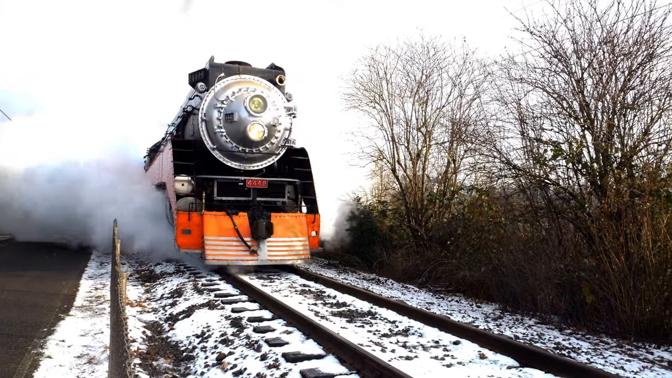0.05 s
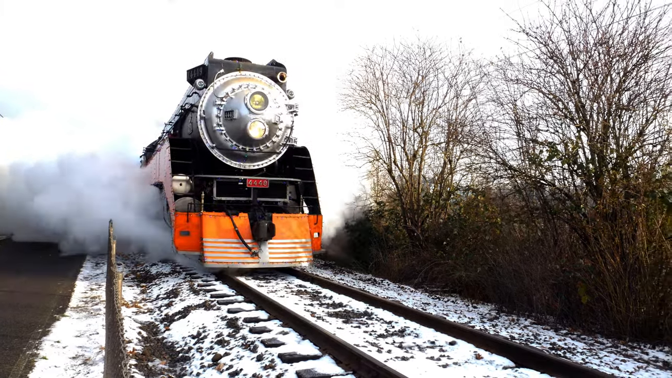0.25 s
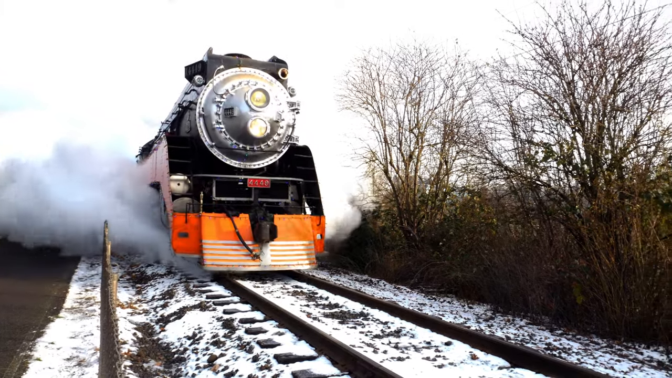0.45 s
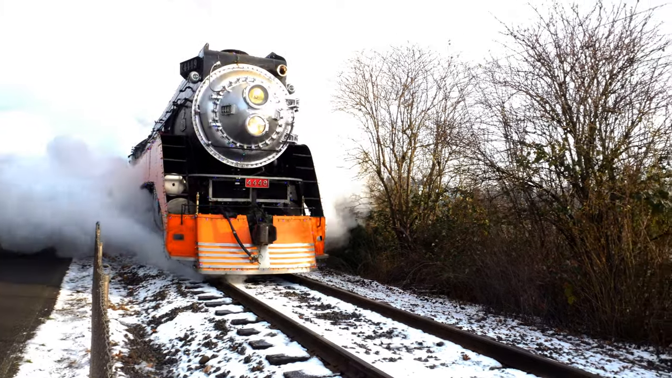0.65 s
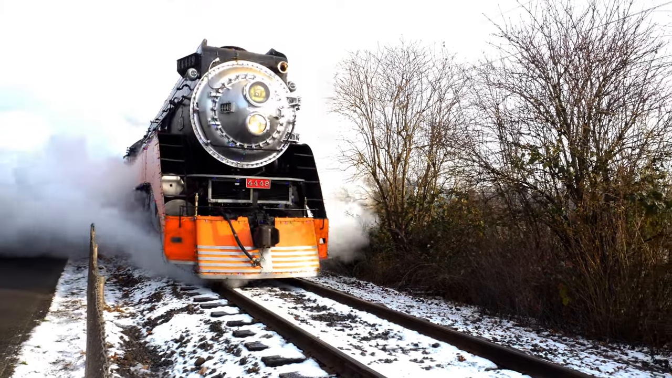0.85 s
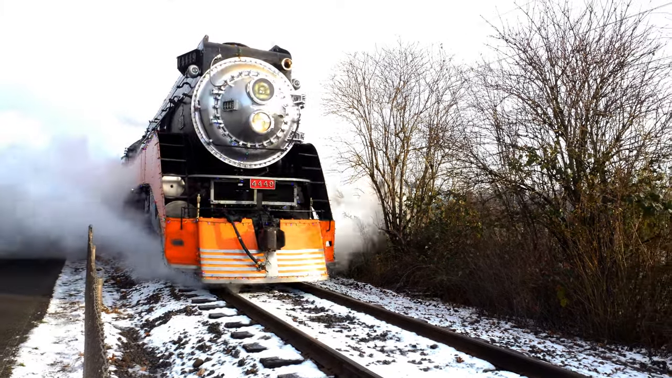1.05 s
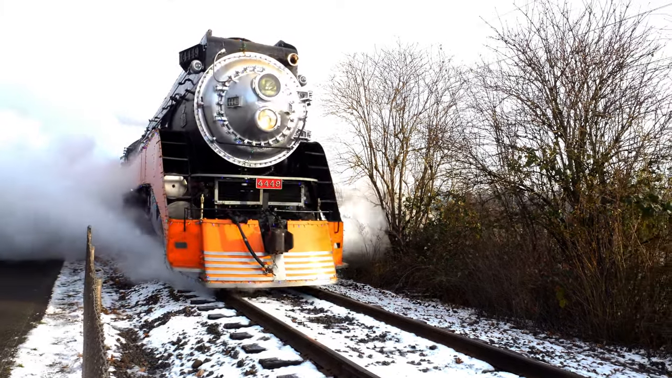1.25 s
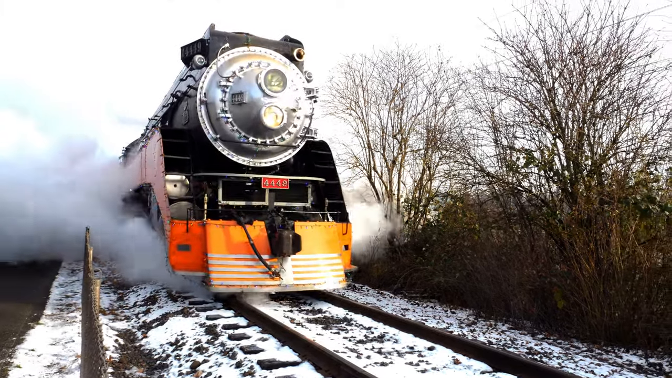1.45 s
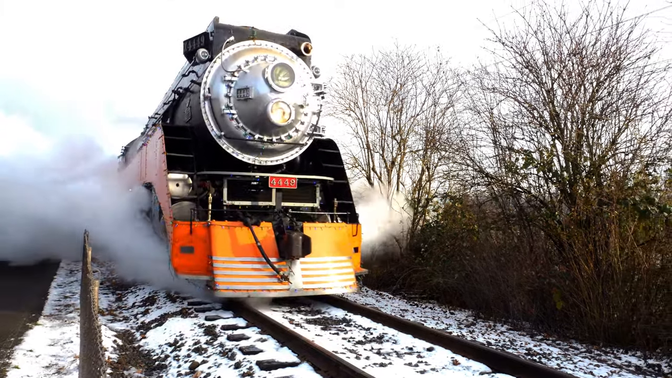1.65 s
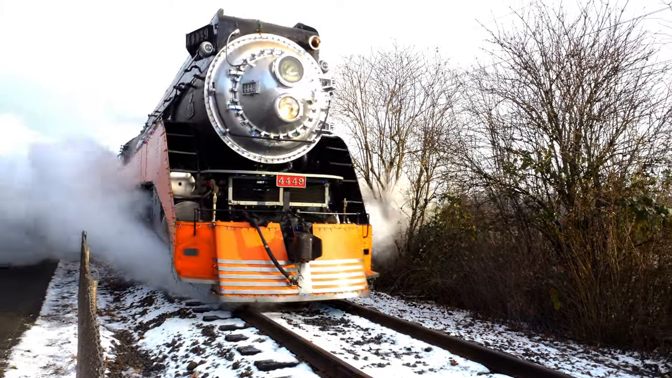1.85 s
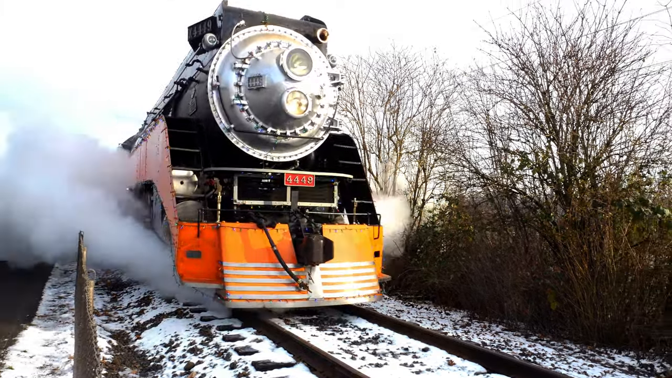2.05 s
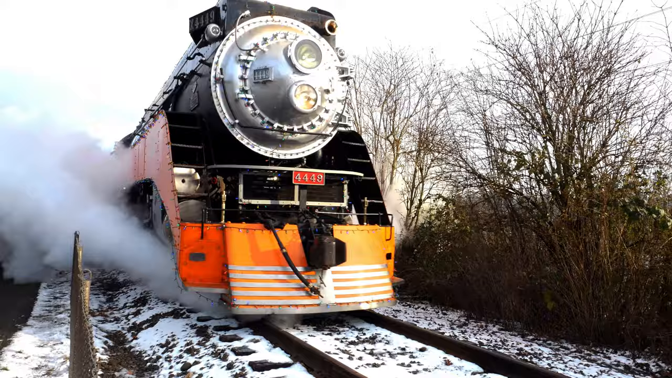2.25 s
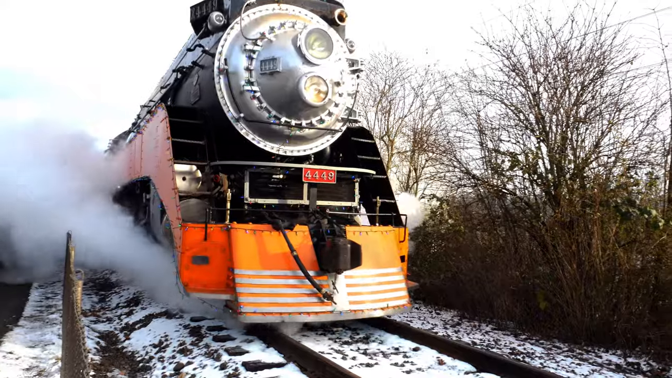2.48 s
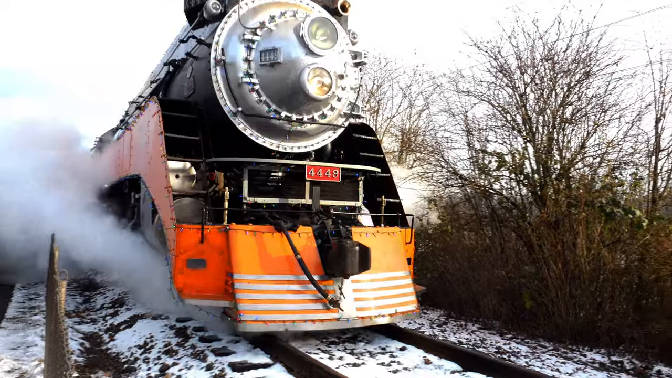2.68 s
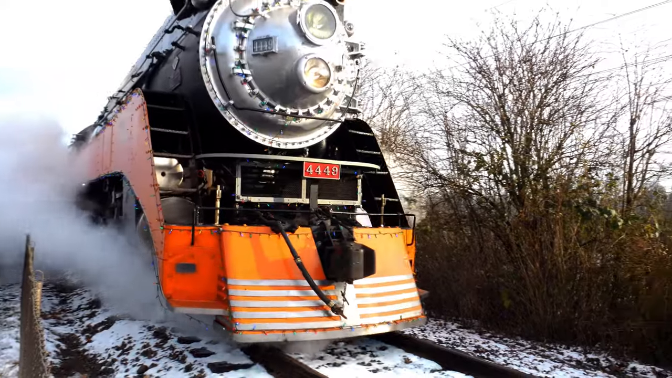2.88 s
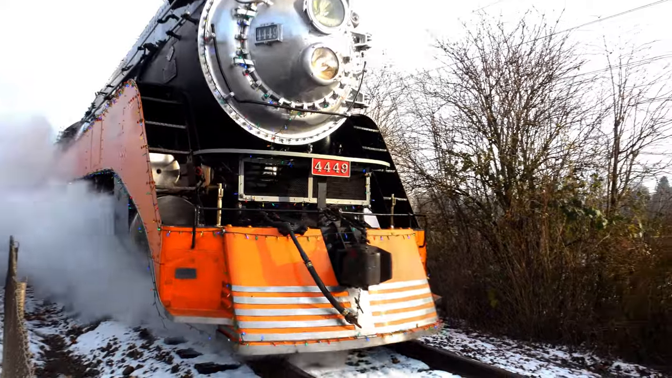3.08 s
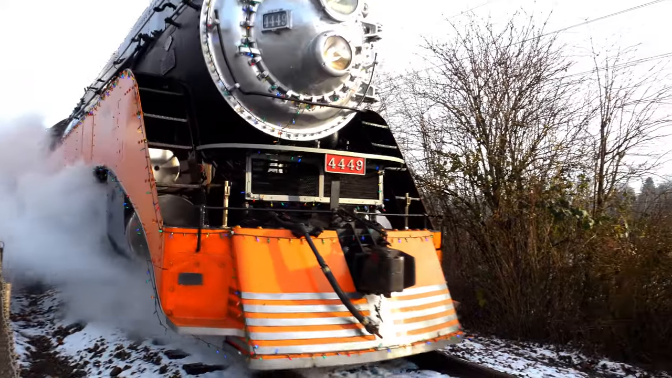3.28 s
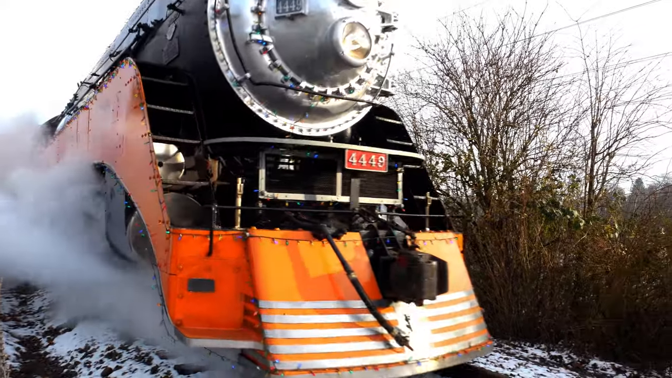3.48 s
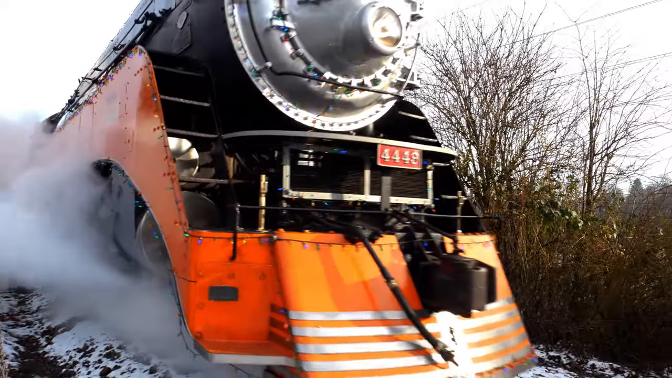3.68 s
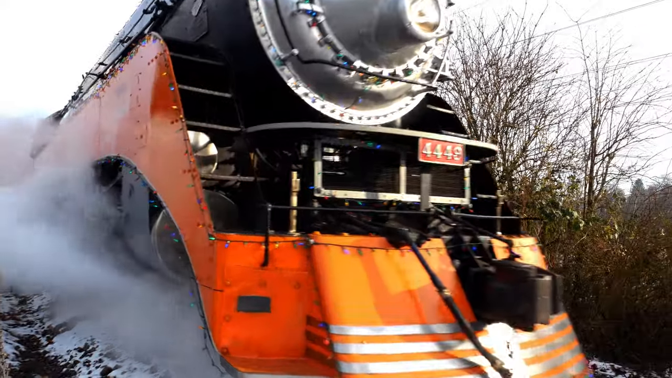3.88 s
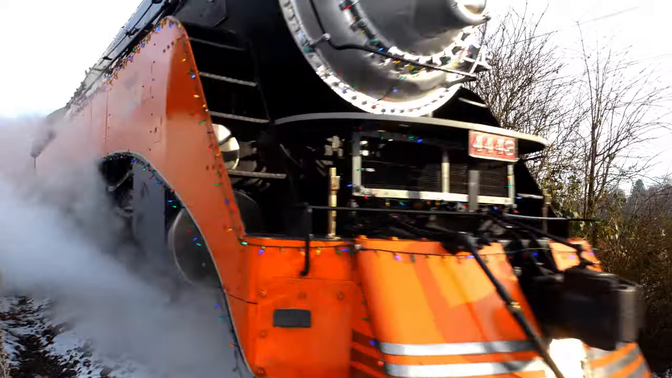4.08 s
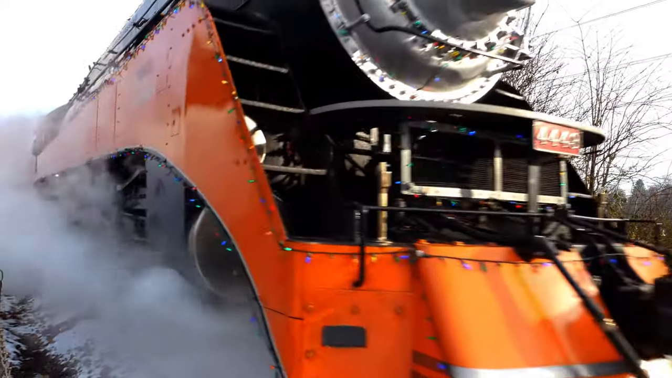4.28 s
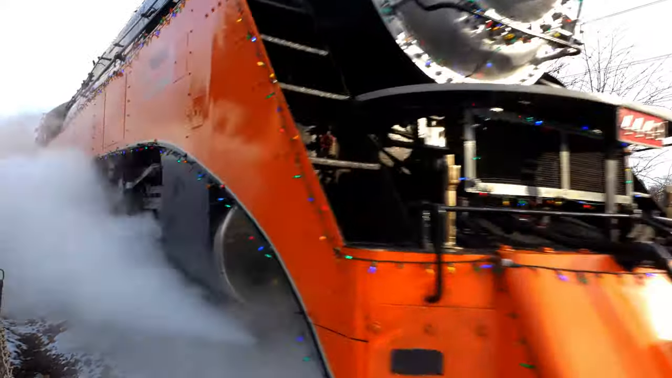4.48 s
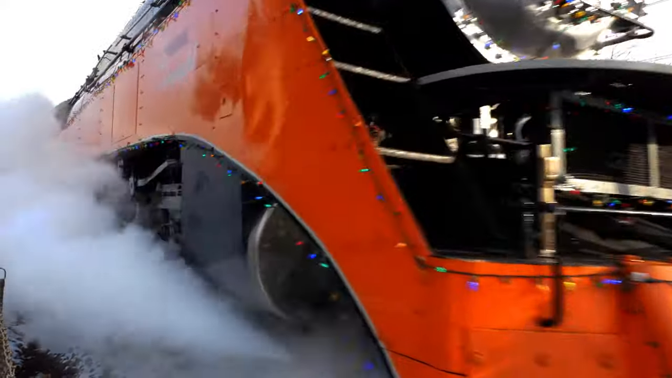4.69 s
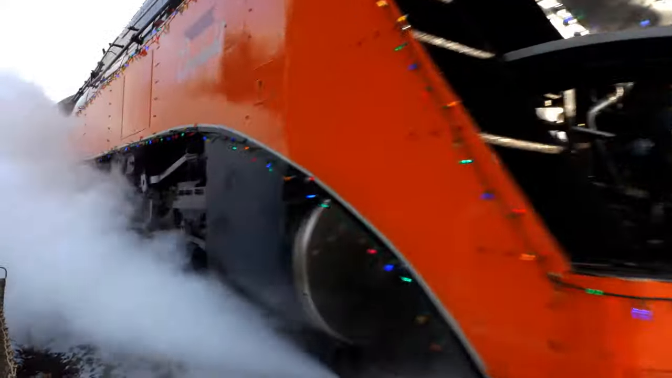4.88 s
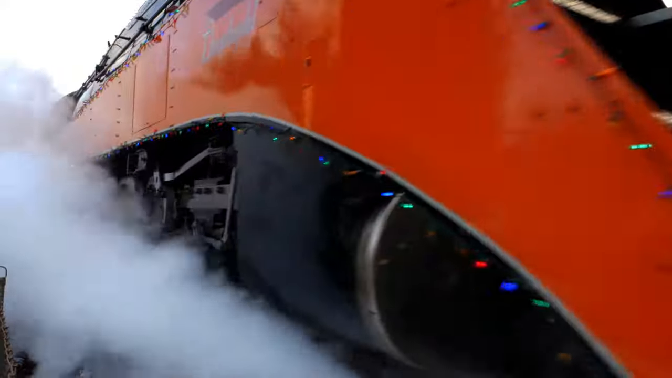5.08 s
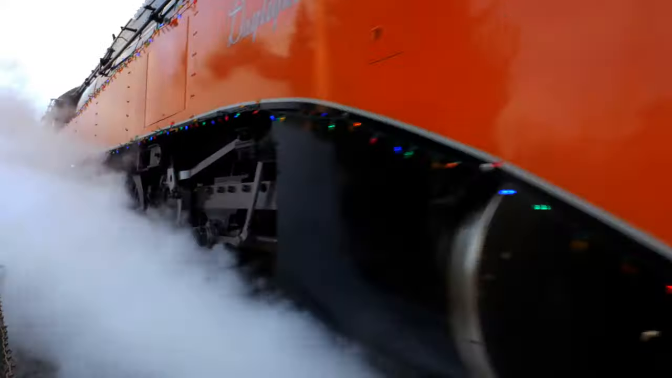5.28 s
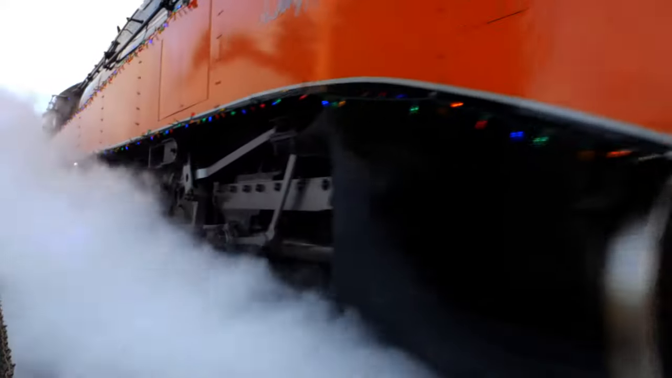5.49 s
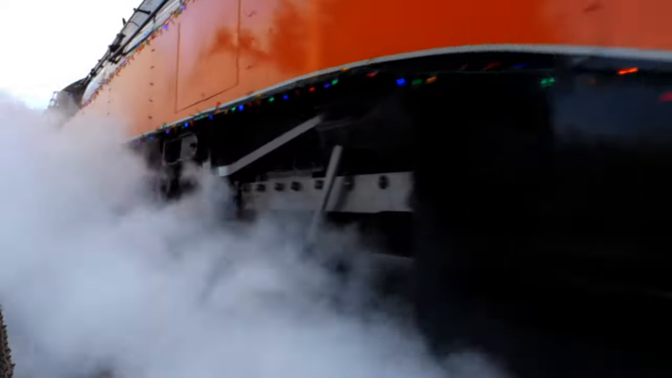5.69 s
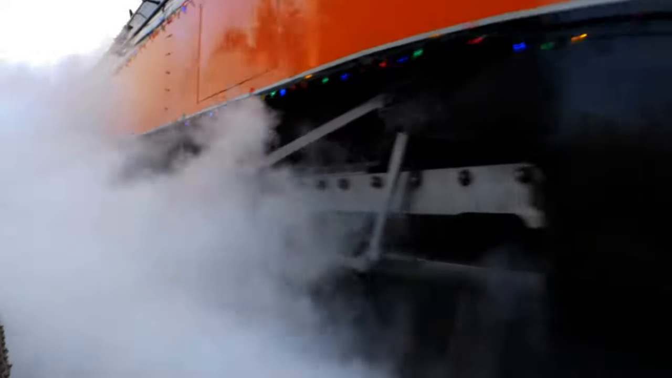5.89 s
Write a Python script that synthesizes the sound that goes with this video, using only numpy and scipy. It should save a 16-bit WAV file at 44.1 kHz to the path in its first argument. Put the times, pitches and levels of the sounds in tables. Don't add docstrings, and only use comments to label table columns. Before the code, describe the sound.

Outdoors beside a snowy track, a slow steam locomotive approaches a stereo microphone. A continuous rough hiss with a wavering, fuzzy high whistle brightens as it nears, over soft hollow chuffs and faint wheel rumble. At about four and a half seconds a close jet swells into a wide, bright, roaring blast, cuts off briefly, then bursts again suddenly with a cough and heavy low thumps, overloading the microphone.

```python
import sys
import numpy as np
from scipy import signal
from scipy.fft import dct
from scipy.io import wavfile
from scipy.ndimage import uniform_filter1d

SR = 44100
rng = np.random.default_rng(int(sys.argv[2]) if len(sys.argv) > 2 else 0)


def linear_from_db(decibels):
    return 10 ** (np.asarray(decibels, float) / 20)


def dump_mix(stems):
    frames = np.atleast_2d(stems).T
    limited = np.clip(frames, -1, 1)
    pcm = np.round(limited * 32767).astype(np.int16)
    wavfile.write(sys.argv[1], SR, pcm)


N = 261951

# t/s, level/dB, clearness of the air path/dB, ground echo f/Hz
FAR_PATH = [(0.0, -21, -7.5, 1610), (0.42, -19.5, -12, 1650), (0.6, -20.5, -18, 1620),
            (0.84, -19.5, -12, 1600), (1.0, -20, -8, 1620), (1.55, -21.5, -8, 1600), (1.85, -19, -6, 1900),
            (2.2, -18.5, -7.5, 1830), (2.4, -21, -5, 1720), (2.62, -18, -3, 1800),
            (2.94, -16.5, -7.5, 1770), (3.25, -17.5, -4.5, 1680), (3.5, -16.5, -2, 1730),
            (3.7, -16, -5, 1690), (3.93, -16.5, -4, 1720), (4.2, -21.5, -5, 1650), (4.36, -23, -11.5, 1630),
            (5.7, -21, -14.5, 1805)]
# f/Hz, level per Hz/dB
FAR_COLOUR = [(24, -38), (60, -22), (112, -11), (305, -17.5), (570, -13.5), (873, -9.5), (1500, -5.5),
              (2300, -5), (3060, -1.5), (4300, -5), (5580, -8.5), (9000, -11.5), (15000, -18.5),
              (21000, -29)]
# t/s, centre f/Hz
WHISTLE_PITCH = [(0.0, 3370), (0.11, 3250), (0.66, 3250), (0.94, 3280), (1.93, 3230), (2.12, 3080),
                 (2.4, 3310), (3.18, 3180), (3.56, 3290), (4.13, 3340), (4.3, 3230), (5.09, 3320),
                 (5.46, 3070), (5.94, 3160)]
# width/Hz, level against the far cock/dB
WHISTLE_PARTS = [
    (190, -6.5),
    (700, -2.5),
]
# f/Hz, width/Hz, level/dB
PIPE_TONES = [(620, 90, -26), (830, 100, -22), (1080, 120, -21), (1400, 140, -20), (2150, 170, -17),
              (2600, 180, -16), (4200, 300, -15)]
# opening t/s, rise time/s, shutting t/s, full level/dB
NEAR_STROKES = [
    (4.415, .065, 5.603, -14.8),
    (5.764, 0.016, 6.2, -13.5),
]
# f/Hz, level per Hz/dB
NEAR_COLOUR = [(20, -20), (50, -8), (335, -10.5), (800, -4.5), (1300, -2), (1790, -1), (2610, -0.5),
               (3250, -0.5), (4400, -3), (5570, -4.5), (8140, -4.5), (12200, -7.5), (15500, -12.5),
               (21000, -18.5)]
# f/Hz, likeness (0-1)
LIKENESS = [(40, .84), (500, .89), (2000, .92), (5000, .87), (15000, .84)]
# t/s, peak level/dB, f/Hz, time to fall 60 dB/s
VALVE_COUGH = [
    (5.772, -12, 330, .08),
]
# t/s, length/s, level/dB, upper pipe tone f/Hz, fall factor
CHUFFS = [
    (.51, 0.22, -33.5, 204, 0.96),
    (1.295, .17, -35, 255, 0.56),
    (2.063, 0.15, -33.5, 194, 0.79),
    (2.801, 0.16, -29.5, 197, 0.9),
    (3.54, 0.16, -34, 190, 0.92),
    (4.19, 0.17, -32.5, 213, 0.96),
    (4.896, 0.25, -38.5, 200, 0.9),
    (5.59, 0.17, -31.5, 190, 1),
]
# t/s, peak level/dB, push time/ms
THUMPS = [
    (2.3, -27, 5),
    (2.35, -25, 4),
    (4.557, -16, 2.8),
    (4.662, -18, 4),
    (5.655, -16, 1.6),
    (5.899, -2, 2.2),
    (5.921, -10, 5),
]
# f/Hz, band level over rounding step/dB
ROUNDING_CARE = [(200, 20), (700, 17), (1400, 12), (3000, 17), (5000, 12), (9000, 9.5), (14000, 6),
                 (15800, -2)]

T = np.arange(N // 128 + 5) * 128 / SR
HZ = np.fft.rfftfreq(512, 1 / SR)


def evened(x):
    return x / np.sqrt(np.mean(x ** 2) + 1e-20)


def noise(count=N):
    return rng.standard_normal(count)


def read(points, hz):
    f, value = np.transpose(points)
    return np.interp(np.log(hz + 1), np.log(f + 1), value)


def slowly(values):
    return np.interp(np.arange(N) / SR, T, values)


def drift(count, span):
    span = max(int(span), 1)
    return evened(uniform_filter1d(uniform_filter1d(noise(count), span), span))


def add(mix, s, sound):
    part = mix[round(s * SR):][:len(sound)]
    part += sound[:len(part)]


def resonate(x, hz, width):
    turn = np.exp(2j * np.pi * np.cumsum(hz * np.ones(x.shape[-1])) / SR)
    r = np.exp(-np.pi * width / SR)
    return 2 * (turn * signal.lfilter([1 - r], [1, -r], x / turn)).real


def bump(hz, octaves):
    return np.exp(-.5 * (np.log2((HZ[:, None] + 1) / hz) / octaves) ** 2)


def mottled(x, frames, bins):
    return evened(uniform_filter1d(uniform_filter1d(x, size=frames, axis=0), size=bins, axis=1))


def jet(colour, band, level_db, tilt_db, patchy_db, cloud_db, gust_db):
    a, b, c, d, patches, clouds = rng.standard_normal((len(T), len(HZ), 6)).T
    patches = mottled(patches, 5, 20)
    clouds = mottled(clouds, 4, 110)
    same = np.clip(read(LIKENESS, HZ), -1, 1)[:, None]
    left = a + 1j * b
    right = same * left + np.sqrt(1 - same ** 2) * (c + 1j * d)
    shape = linear_from_db(read(colour, HZ))
    shape = shape / np.linalg.norm(shape[(HZ > band[0]) & (HZ < band[1])])
    unrest_db = patchy_db * patches + cloud_db * clouds + gust_db * drift(len(T), 8)
    z = np.array([left, right]) * shape[:, None] * linear_from_db(level_db + tilt_db + unrest_db)
    steam = signal.istft(z, nperseg=512, noverlap=384)[1][:, :N] / np.sqrt(1.5)
    no_deep_bass = signal.butter(2, 70, "high", fs=SR, output="sos")
    return signal.sosfilt(no_deep_bass, steam)


def far_cock():
    s, *columns = np.transpose(FAR_PATH)
    level_db, clear_db, echo_hz = (np.interp(T, s, c) for c in columns)
    clear_db = clear_db + 5.5
    flank_db = 4.5 * (T > 5.0)
    body_db = 0.46 + 0.18 * clear_db + flank_db
    shoulder_db = 0.1 + .3 * clear_db + flank_db
    airy = np.clip(np.log2((HZ[:, None] + 1) / 5000) / 1.73, 0, 2)
    tilt_db = bump(echo_hz, 0.38) * 1.1 * body_db
    tilt_db = tilt_db + bump(700, 0.62) * 1.3 * np.maximum(body_db, -1)
    tilt_db = tilt_db + bump(4400, 0.36) * 1.1 * shoulder_db + airy * clear_db
    hiss = jet(FAR_COLOUR, (2500, 3900), level_db - 1.5, tilt_db,
               patchy_db=1.3, cloud_db=1.04, gust_db=1.14)
    tones = whistle() + ground_echo(body_db, echo_hz) + pipe_tones()
    return hiss + tones * linear_from_db(slowly(level_db))


def whistle():
    centre_hz = np.interp(T, *np.transpose(WHISTLE_PITCH))
    centre_hz = slowly(centre_hz * (1 + 0.017 * drift(len(T), 23)))
    out = np.zeros(N)
    for width, db in WHISTLE_PARTS:
        waver_db = slowly(1.3 * drift(len(T), 25))
        out += linear_from_db(db + waver_db) * evened(resonate(noise(), centre_hz, width))
    return out


def ground_echo(body_db, echo_hz):
    focus_s, focus_length_s, focus_db = 2.72, 0.22, 5.5
    lined_up_db = focus_db * np.exp(-((T - focus_s) / focus_length_s) ** 2)
    loudness = linear_from_db(slowly(1.1 * body_db - 13.5 + lined_up_db))
    return loudness * evened(resonate(noise(), slowly(echo_hz), 140))


def pipe_tones():
    out = np.zeros(N)
    for hz, width, db in PIPE_TONES:
        wander = slowly(1 + .04 * drift(len(T), 60))
        swell_db = slowly(3.5 * np.tanh(drift(len(T), 40)))
        out += linear_from_db(db + swell_db) * evened(resonate(noise(), hz * wander, width))
    return out


def near_cock():
    full_db, loss_db = throttle(T)
    body_db = -3 + np.minimum(-0.57 * throttle(T - 0.021)[1], 11)
    core_db = 1.7 - 2 * (T - NEAR_STROKES[0][0])
    tilt_db = bump(1300, 1.0) * body_db + bump(3600, 0.24) * core_db
    tilt_db = tilt_db + bump(13000, .9) * .3 * loss_db
    whistle_hz = np.interp(T, *np.transpose(WHISTLE_PITCH))
    tilt_db = tilt_db + bump(whistle_hz, .07) * 3.2
    return jet(NEAR_COLOUR, (6000, 15000), full_db + loss_db + 6.5, tilt_db,
               patchy_db=1.12, cloud_db=-0.1, gust_db=-0.15)


def throttle(t):
    cracked_db, shut_db_per_s, shut_s, swell_db_per_s = -23.5, -550, 0.055, 1.3
    stroke = np.maximum(np.searchsorted([row[0] for row in NEAR_STROKES], t) - 1, 0)
    opens, rise, shuts, full_db = np.transpose(NEAR_STROKES)[:, stroke]
    late = np.maximum(t - shuts + shut_s, 0)
    loss_db = cracked_db * np.exp(-np.maximum(t - opens, 0) / rise)
    loss_db = loss_db + shut_db_per_s * late ** 2 / (late + shut_s)
    full_db = full_db + swell_db_per_s * (t - (opens + shuts) / 2)
    return full_db, np.where(t < opens, -90, np.maximum(loss_db, -90))


def valve_cough():
    out = np.zeros(N)
    t = np.arange(4000) / SR
    for s, db, hz, t60 in VALVE_COUGH:
        breath = evened(resonate(noise(len(t)), hz * 1.2, 300))
        cough = np.sin(2 * np.pi * hz * t) + 0.57 * breath
        add(out, s, linear_from_db(db - 60 * t / t60) * (1 - np.exp(-t / 0.0039)) * cough)
    return out


def gust_thumps():
    out = np.zeros(N)
    for s, db, ms in THUMPS:
        u = np.arange(3000) / SR * 1000 / ms
        add(out, s, linear_from_db(db) * np.tanh(1.8 * u) * 2 * (1 - u) * np.exp(-u))
    return out


def puff(length, db, fall, *tones):
    air = noise(SR // 2)[:int(length * SR)]
    sink = np.linspace(1, fall, len(air))
    hollow = np.zeros(len(air))
    for hz, width, tone_db in tones:
        once = resonate(air, hz * sink, width)
        hollow += linear_from_db(tone_db) * evened(resonate(once, hz * sink, width))
    steady = hollow / (uniform_filter1d(hollow ** 2, size=1300) + .05) ** .35
    return linear_from_db(db) * evened(steady) * signal.windows.tukey(len(air), .7)


def stack_chuffs():
    out = np.zeros(N)
    for s, length, db, hz, fall in CHUFFS:
        lower_db = -10.5 + 2.5 * s
        tones = (hz, 80, 0), (hz * .53, 45, lower_db), (hz * 1.54, 80, -9), (hz * 2.05, 70, -9)
        add(out, s, puff(length, db, fall, *tones))
    return out


def rumble_and_buffet():
    low_band = signal.butter(2, [22, 95], "band", fs=SR, output="sos")
    low = signal.sosfilt(low_band, noise())
    lumps_db = 4.5 * drift(len(T), 40)
    wheels = linear_from_db(-64 + 3.5 * T + lumps_db)
    buffet = linear_from_db(-36.5 + throttle(T)[1] + .3 * lumps_db)
    return evened(low) * slowly(wheels + buffet)


def scene():
    steam = far_cock() + near_cock()
    low_sounds = valve_cough() + gust_thumps() + stack_chuffs() + rumble_and_buffet()
    return steam + low_sounds


def recorder_rounding(x):
    size, start = 1024, 31
    hz = (np.arange(size) + .5) * SR / (2 * size)
    frames = N // size + 3
    window = signal.windows.kaiser_bessel_derived(2 * size, 4 * np.pi)
    pair = np.pad([x[0] + x[1], x[0] - x[1]], ((0, 0), (2 * size - start, 3 * size)))
    places = np.arange(frames)[:, None] * size + np.arange(2 * size)
    a, b, c, d = np.split(pair[:, places] * window, 4, axis=2)
    z = dct(np.dstack([-c[..., ::-1] - d, a - b[..., ::-1]]), type=4, norm="ortho")
    band = (12 * np.log2(1 + hz / 900)).astype(int)
    power = np.array([np.bincount(band, row) for row in z[0] ** 2])
    power = power / np.maximum(np.bincount(band), 1)
    scarce_db = drift(frames, 1)[:, None] + .75 * rng.standard_normal(power.shape)
    step = np.sqrt(power + 1e-12)[:, band] / linear_from_db(read(ROUNDING_CARE, hz))
    starved_db = np.where(scarce_db > -.4, 60, 2 * scarce_db + 5)
    step = step * linear_from_db(np.array([1.5 * scarce_db, starved_db])[..., band])
    step = np.maximum(step, linear_from_db(-29) * (hz > 10500))
    kept = hz < 15820 + 70 * scarce_db[:, -1:]
    z = np.sign(z) * np.floor(abs(z) / step + .4) * step * kept
    e, f = np.split(dct(z, type=4, norm="ortho"), 2, axis=2)
    parts = np.dstack([f, -f[..., ::-1], -e[..., ::-1], -e]) * window
    both = parts[:, 1:, :size] + parts[:, :-1, size:]
    total, difference = both.reshape(2, -1)[:, size - start:size - start + N]
    return np.array([total + difference, total - difference]) / 2


def low_pass(x):
    return signal.sosfilt(signal.butter(12, 16620, fs=SR, output="sos"), x)


def record(dry):
    ceiling, knee = .45, 6.
    clipped = dry / (1 + abs(dry / ceiling) ** knee) ** (1 / knee)
    mix = recorder_rounding(clipped)
    return low_pass(mix)


dry = scene()
out = record(dry)
dump_mix(out)
```